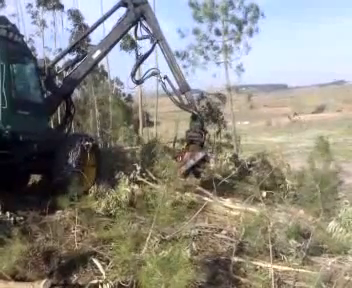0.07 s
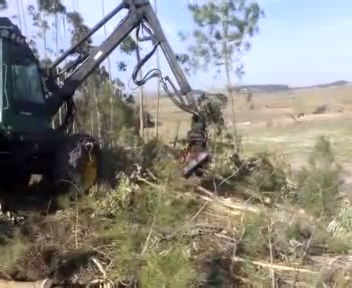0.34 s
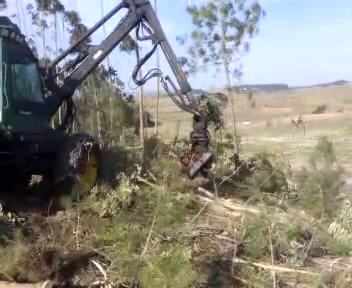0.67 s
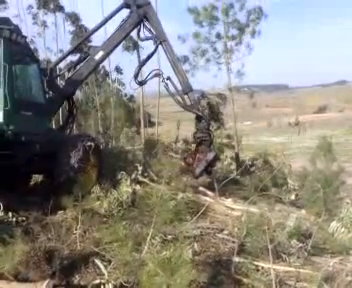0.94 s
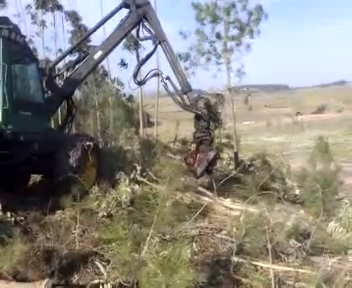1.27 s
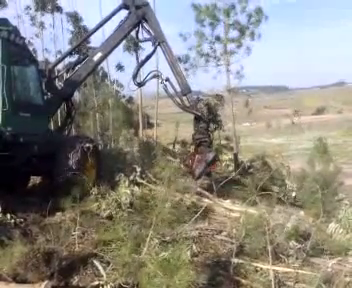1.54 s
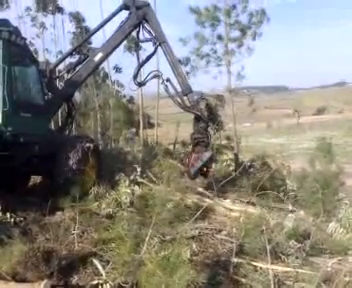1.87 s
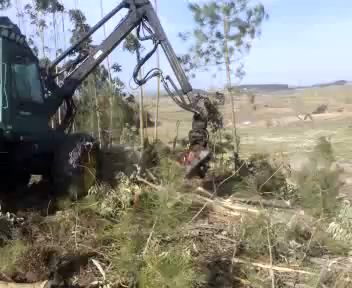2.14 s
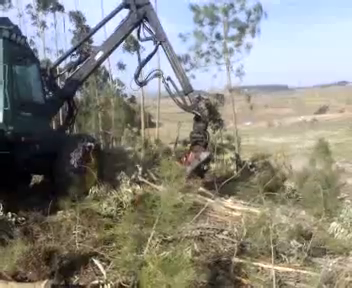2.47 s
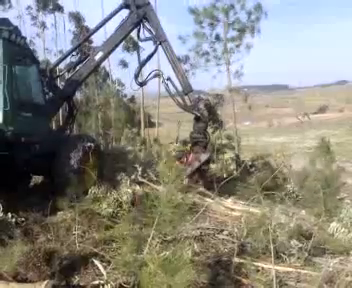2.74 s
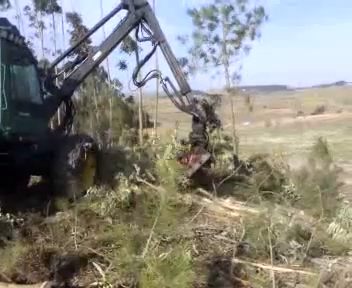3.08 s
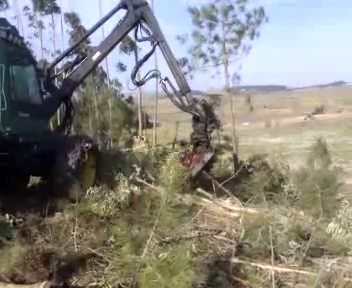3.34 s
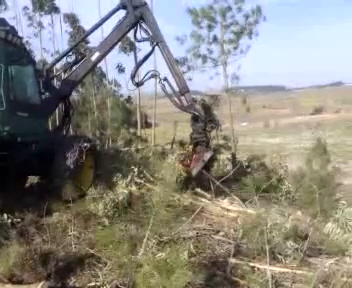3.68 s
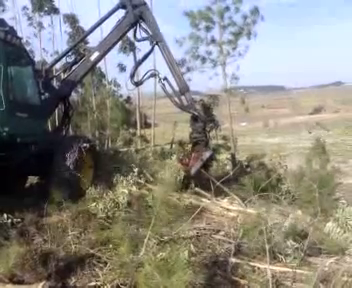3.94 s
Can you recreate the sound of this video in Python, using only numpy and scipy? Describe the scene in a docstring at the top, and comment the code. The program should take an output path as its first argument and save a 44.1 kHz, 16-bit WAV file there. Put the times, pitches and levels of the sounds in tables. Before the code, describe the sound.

A tree harvester runs in gusty wind, making one short saw cut and cracking branches.

```python
"""A forestry harvester at work in an open field, heard from one microphone standing out in the wind.
Its diesel drones and clatters; its hydraulics hiss and whine. Branches crack, the saw in its head
makes one short cut that drags the engine down, then the stem is pulled through, scraping.
For the first two seconds gusts buffet the microphone and overload it."""
import sys
import numpy as np
from scipy import signal
from scipy.fft import rfft, irfft
from scipy.io import wavfile

SR = 44100
rng = np.random.default_rng(int(sys.argv[2]) if len(sys.argv) > 2 else 0)


def bounce(signal):
    """Save signal as a 16-bit WAV file at the path given by the first command-line argument."""
    frames = np.transpose(np.atleast_2d(signal))
    limited = np.clip(frames, -1, 1)
    pcm = np.round(limited * 32767).astype(np.int16)
    wavfile.write(sys.argv[1], SR, pcm)


N = 176400
FREE_HZ = 83.8  # firing rate of the engine running free


def undb(db):
    """Decibels to gain."""
    return 10 ** (np.asarray(db) / 20)


def unit(x):
    """Scale to rms 1."""
    return x / np.sqrt(np.mean(x ** 2))


def clock():
    """Time of every sample, in seconds."""
    return np.arange(N) / SR


def curve(rows):
    """Join (t, value) rows by straight lines."""
    return np.interp(clock(), *np.array(rows).T)


def walk(rate_hz):
    """Smooth random motion up to about rate_hz, rms 1."""
    hz = np.arange(N // 2 + 1) * SR / N
    return unit(irfft(rfft(rng.standard_normal(N)) / (1 + (hz / rate_hz) ** 4), N))


def noise(points, gate=1):
    """Gated noise coloured by (f/Hz, level/dB) points, rms 1."""
    f, db = np.array(points).T
    hz = np.arange(1, N // 2 + 2) * SR / N
    gain = undb(np.interp(np.log(hz), np.log(f), db)) * np.minimum(hz / f[0], 1) ** 2
    return unit(irfft(rfft(gate * rng.standard_normal(N)) * gain, N))


def ring(x, modes):
    """Drive (f/Hz, width/Hz, level/dB) resonances with x."""
    hz = np.arange(1, N // 2 + 2) * SR / N
    gain = 0
    for f, width, db in modes:
        response = 1 / (1 + .64j * f / width * (hz / f - f / hz)) ** 2
        gain = gain + undb(db) * response / np.sqrt(np.mean(np.abs(response) ** 2))
    return irfft(rfft(x) * gain, N)


def engine(firing_hz):
    """Exhaust orders ring the pipe and grow under load; block and panels clatter at each firing."""
    # exhaust harmonics: multiple of the firing rate, relative level/dB
    orders = [(1, 2), (2, -15.5), (2.5, -23), (3, -12), (3.5, -31.5), (4, -10.5), (4.5, -19), (5, -20),
              (6, -22.5), (7, -23.5), (7.5, -21.5), (8, -19.5)]
    # exhaust pipe resonances: f/Hz, width/Hz, boost/dB
    pipe_modes = [(213.4, 8.3, 9.5), (266, 16, 11), (322.7, 14, 6), (524, 14, 9.5)]
    # spectrum of block and fan: f/Hz, relative level/dB
    block_spectrum = [(30, -3.5), (130, -4.5), (210, -3.5), (290, 6), (360, -3.5), (450, -7.5), (750, 3),
                      (1100, -1.5), (1600, -2.5), (1950, -5), (2250, -8), (2850, -12.5), (3800, -15),
                      (7500, -45.5)]
    # steel panel resonances: f/Hz, width/Hz, level/dB
    panel_modes = [(318, 24, -40.5), (626.4, 14, -48.5), (731, 15, -51), (877, 10, -47), (1135, 49, -47.5),
                   (1423, 79, -47), (1515, 22, -47.5), (1602, 16, -47), (1732, 47, -47.5),
                   (2198, 65, -45.5), (2630, 60, -53.5), (3780, 50, -58), (4396, 76, -51),
                   (5000, 290, -46.5)]
    exhaust_db, block_db = -32.5, -33
    firings = np.cumsum(firing_hz) / SR
    exhaust = 0
    for order, db in orders:
        hz = order * firing_hz
        pipe_db = sum(boost / (1 + ((hz - f) / width) ** 2) for f, width, boost in pipe_modes)
        load_db = .39 * (FREE_HZ - firing_hz) / order  # louder as the engine is dragged down
        flutter = 1 + .13 * np.log(order + .17) * (walk(8) + 1j * walk(8))
        tone = np.exp(2j * np.pi * (order * firings + rng.random()))
        exhaust = exhaust + undb(db + pipe_db + load_db) * np.sqrt(2) * (flutter * tone).real
    knocks = np.exp(-(firings % 1) / .35)
    clatter = (1 + .78 * knocks) * undb(.46 * walk(40))
    panels = ring(unit(clatter * rng.standard_normal(N)), panel_modes)
    return undb(exhaust_db) * exhaust + undb(block_db) * noise(block_spectrum, clatter) + panels


def hydraulics(firing_hz):
    """Oil hisses through the valves; the pump whines in step with the engine."""
    # oil hiss over time: t/s, level/dB
    oil_levels = [(0, -28), (.15, -34), (.85, -35.5), (1.1, -45.5), (1.5, -42.5), (2.5, -44), (2.7, -41),
                  (3.3, -40.5), (4, -44.5)]
    # spectrum of the hiss: f/Hz, relative level/dB
    oil_spectrum = [(1500, -14), (2300, 6.5), (2850, -6.5), (3700, 0.5), (4150, -6.5), (4600, 1.5),
                    (5050, -2.5), (5600, -6.5), (6250, -5), (7400, -34)]
    # pump tones at free engine speed and rms flow: f/Hz, level/dB
    pump_tones = [(3700, -68), (4970, -51.5), (5450, -49), (6200, -64)]
    flow = undb(curve(oil_levels))
    whine = 0
    for f, db in pump_tones:
        pitch = f * firing_hz / FREE_HZ * (1 + .002 * walk(69))
        flicker = 1 + .5 * walk(20)
        whine = whine + undb(db) * flicker * np.sin(2 * np.pi * np.cumsum(pitch) / SR)
    hiss = flow * noise(oil_spectrum, undb(2 * walk(140)))
    return hiss + unit(flow) * whine


def wind():
    """Eddies buffet the microphone, brighter in strong gusts; slow ones thump."""
    # gust strength at the microphone: t/s, level/dB
    gusts = [(0, -12.5), (.04, -14), (.10, -3), (.17, -10.5), (.24, -10), (.34, -10), (.41, -13.5),
             (.47, -6), (.57, -7.5), (.63, -21), (.7, -10.5), (.8, -7.5), (.86, -13), (.9, -6.5),
             (.93, -11), (1.0, -7.5), (1.025, -21), (1.08, -30.5), (1.14, -12.5), (1.21, -21), (1.33, -18),
             (1.43, -13.5), (1.51, -11.5), (1.56, -19.5), (1.63, -19.5), (1.7, -31), (1.73, -17.5),
             (1.77, -30.5), (1.84, -24), (1.98, -44), (2.1, -62)]
    # slow eddies, each a bell-shaped swell: t/s, half-width/s, level/dB
    eddies = [(0.225, 0.033, -10), (0.486, 0.014, -19), (0.944, 0.015, -14), (2.41, 0.039, -33.5),
              (2.493, 0.017, -21)]
    # spectrum of the buffeting: f/Hz, relative level/dB
    buffet_spectrum = [(20, -8), (55, -12), (100, -1.5), (160, -0.5), (260, -1), (420, -3.5), (800, -12),
                       (1300, -26.5), (2500, -51), (6000, -69)]
    # spectrum of the rush in strong gusts: f/Hz, relative level/dB
    rush_spectrum = [(150, -8.5), (450, 1), (900, 2), (1400, -8), (2200, -18), (4000, -30.5), (7000, -78)]
    # spectrum of the thumps: f/Hz, relative level/dB
    thump_spectrum = [(25, -8.5), (70, -7), (130, 2.5), (280, -3.5), (420, -12.5), (800, -22),
                      (2000, -62.5)]
    strong_db, rush_db = -4.5, -6  # a strong gust, and its rush relative to it
    force = undb(curve(gusts) + 1.1 * walk(58))
    rush = undb(strong_db + rush_db) * (force / undb(strong_db)) ** 1.25
    rush *= undb(.72 * walk(90))
    thumps = sum(undb(db) * np.exp(-.5 * ((clock() - at) / width) ** 2) for at, width, db in eddies)
    return force * noise(buffet_spectrum) + rush * noise(rush_spectrum) + thumps * noise(thump_spectrum)


def stem():
    """Bark hisses past the knives; branches give way, scrape and splinter."""
    # stem sliding through the head: t/s, level/dB
    feed_levels = [(2.7, -52), (2.95, -41.5), (3.25, -40), (3.4, -40.5), (3.55, -49), (3.8, -50)]
    # spectrum of bark and splinters: f/Hz, relative level/dB
    splinter_spectrum = [(1500, -15.5), (3300, 3.5), (5000, 10.5), (6300, 5.5), (7200, -1), (7800, -15)]
    # spectrum of scraping wood: f/Hz, relative level/dB
    wood_spectrum = [(300, -11.5), (550, 1), (800, -1), (1700, -1), (2600, -6), (5000, -36)]
    # branches scraping and breaking: t/s, decay/s, wood level/dB, splinter level/dB
    branches = [(1.078, 0.009, -45, -41.5), (1.27, 0.016, -39, -48), (2.04, 0.12, -29, -54),
                (2.149, 0.043, -36.5, -38), (2.24, 0.054, -33, -47), (2.331, 0.043, -29, -52),
                (2.371, 0.015, -32, -39), (3.295, 0.034, -29, -32), (3.53, 0.026, -28.5, -40),
                (3.566, 0.031, -31, -45)]
    attack_s = .019
    wood = noise(wood_spectrum, undb(4.4 * walk(120)))
    splinters = noise(splinter_spectrum, undb(2.5 * walk(400)))
    out = undb(curve(feed_levels)) * splinters
    for at, decay, wood_db, splinter_db in branches:
        age = clock() - at
        envelope = np.clip(1 + age / attack_s, 0, 1) * np.exp(-np.maximum(age, 0) / decay)
        out = out + envelope * (undb(wood_db) * wood + undb(splinter_db) * splinters)
    return out


def saw():
    """Teeth rasp through the wood, and the chain squeals in short glides."""
    # rasp through the cut: t/s, level/dB
    rasp_levels = [(1.48, -51.5), (1.62, -35.5), (1.8, -29), (1.97, -31.5), (2.14, -36), (2.22, -48)]
    # spectrum of the rasp: f/Hz, relative level/dB
    rasp_spectrum = [(400, -13.5), (900, -13.5), (1800, -0.5), (2550, 0), (2900, -6.5), (3250, 2),
                     (3800, -5.5), (4500, 1), (5400, -6.5), (7000, -6.5), (7800, -20.5)]
    # chain squeals: t/s, length/s, start f/Hz, end f/Hz, level/dB
    squeals = [(1.59, .12, 3140, 3470, -37), (1.64, .07, 1250, 1510, -31), (1.653, 0.092, 1950, 2110, -41),
               (1.683, .11, 2590, 2570, -34.5), (1.742, 0.1, 1020, 905, -26),
               (1.768, 0.11, 3300, 3180, -33), (1.781, 0.051, 2450, 2230, -45),
               (1.788, 0.065, 1380, 1390, -27.5), (1.847, 0.065, 960, 1075, -33),
               (1.857, 0.12, 2570, 2740, -33), (1.95, 0.13, 2470, 2390, -41)]
    out = undb(curve(rasp_levels)) * noise(rasp_spectrum, undb(1.8 * walk(300)))
    for at, length, start_hz, end_hz, db in squeals:
        progress = np.clip((clock() - at) / length, 0, 1)
        pitch = (start_hz + (end_hz - start_hz) * progress) * (1 + .014 * walk(150))
        envelope = undb(db) * np.sin(np.pi * progress) * (1 + .35 * walk(87))
        out = out + envelope * np.sin(2 * np.pi * np.cumsum(pitch) / SR)
    return out


def scene():
    """The harvester in the field and the wind right on the microphone, in mono."""
    # engine firing rate, sagging in the cut: t/s, f/Hz
    firing_rates = [(0, 78), (1.55, 96.4), (1.75, 86), (1.9, 76), (2.05, 73.5), (2.25, 82.2), (2.5, 81.3),
                    (2.75, 84), (3.32, 81.8), (3.5, 77.6), (3.65, 85.5), (3.8, 89.4), (4, 88.5)]
    firing_hz = curve(firing_rates) * (1 + .002 * walk(5))
    return (engine(firing_hz) + hydraulics(firing_hz) + wind() + stem() + saw())[None]


def record(dry):
    """The recorder rounds off the gusts' peaks and cuts the top."""
    ceiling, knee, top_hz = .72, 3.8, 7550
    rounded = dry / (1 + np.abs(dry / ceiling) ** knee) ** (1 / knee)
    return signal.sosfilt(signal.ellip(10, .3, 80, top_hz, fs=SR, output="sos"), rounded)


dry = scene()
out = record(dry)
bounce(out)
```